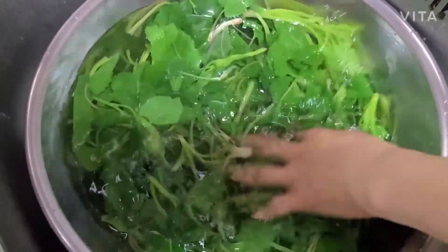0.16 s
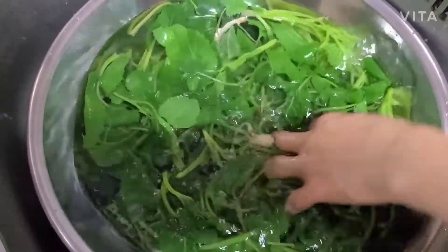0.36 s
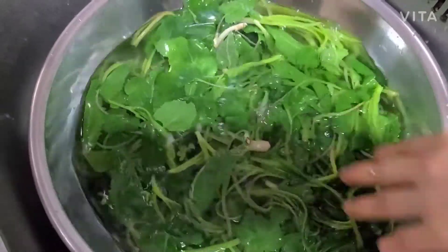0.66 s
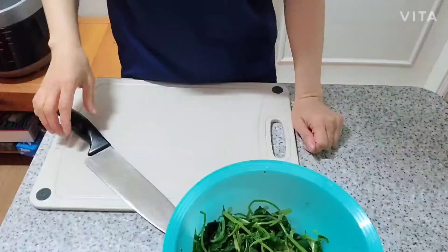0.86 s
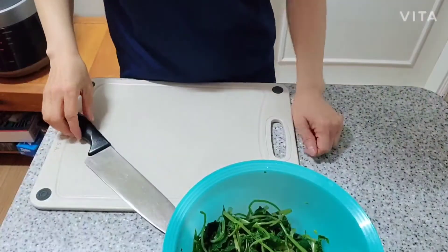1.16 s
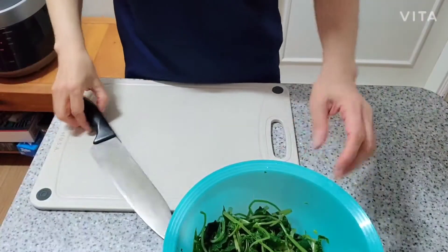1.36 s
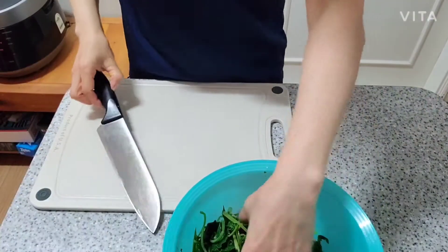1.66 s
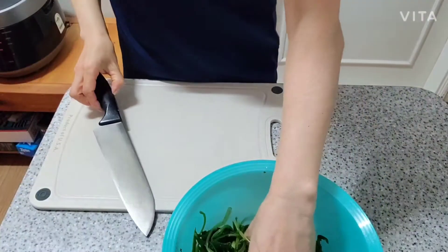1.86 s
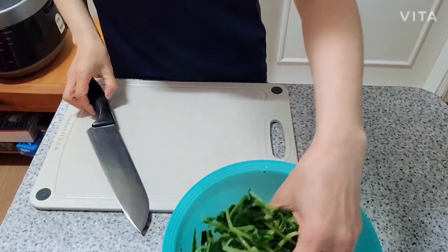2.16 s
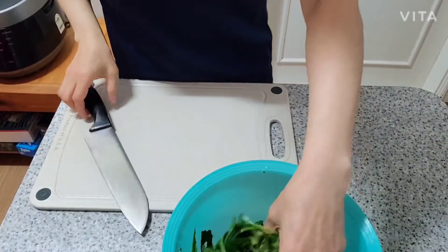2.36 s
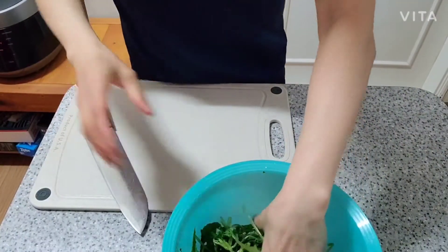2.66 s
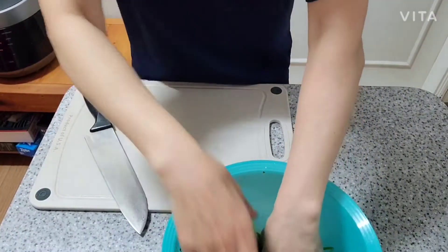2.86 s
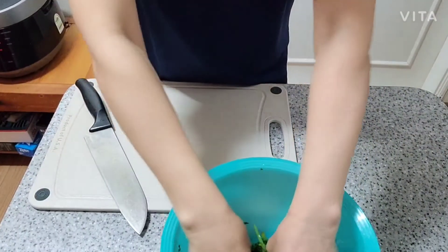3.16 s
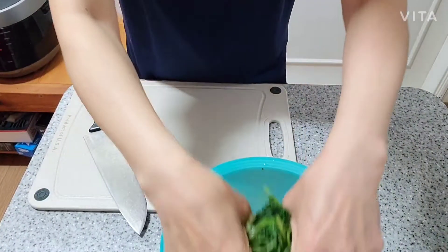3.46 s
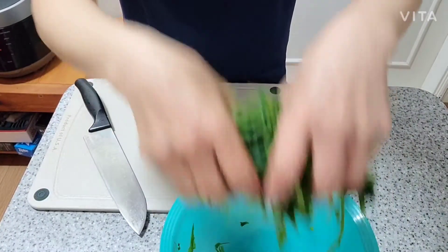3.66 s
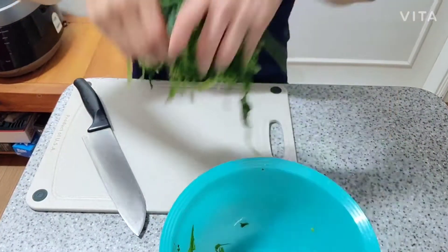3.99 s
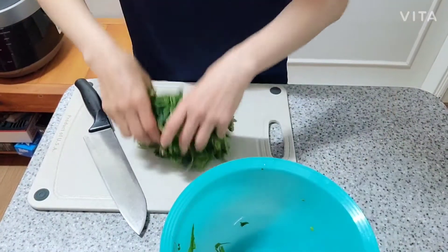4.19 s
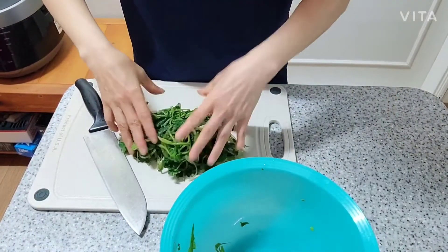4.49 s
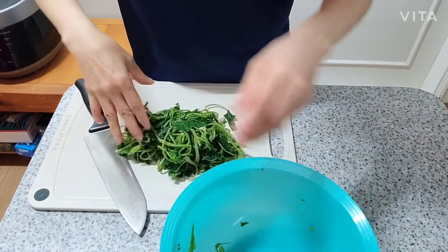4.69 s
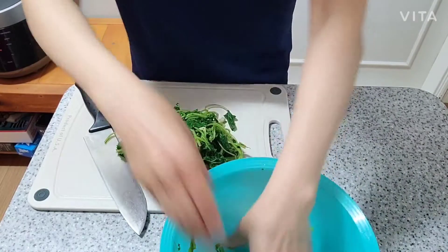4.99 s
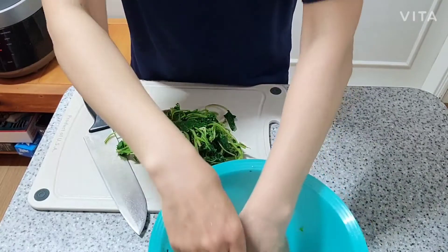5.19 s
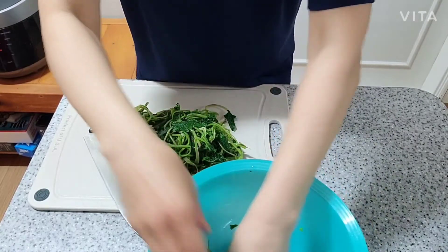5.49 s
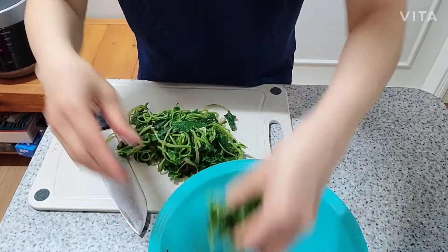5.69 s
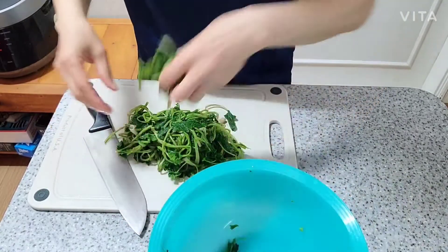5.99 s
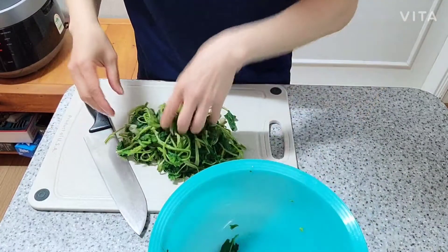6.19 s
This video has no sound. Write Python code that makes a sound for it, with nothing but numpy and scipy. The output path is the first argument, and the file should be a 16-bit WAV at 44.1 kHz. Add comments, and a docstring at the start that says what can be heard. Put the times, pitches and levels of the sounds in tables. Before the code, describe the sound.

From 0 to 0.2 s a hand swishes greens in a steel basin: lively fizz, quick bright bubble plinks, and steady airy hiss. The stirring subsides, faint thin tones linger around 0.3-0.4 s, and everything cuts at 0.64 s to silence. At 0.82 s a much quieter kitchen hum begins, with soft low thumps, small gurgling presses and leaf rustle until 1.4 s, then a wet slap and squelch at 1.8 s. A leaf snap at 2.35 s leads to a short blade scrape and loud, hard knife clatter on plastic at 2.5-2.6 s. Squeezing squelches and slaps cluster at 3.0-3.2 s. Near silence follows until greens land softly at 4.25 s. At 5.1-5.2 s a plastic bowl knocks hollowly with leafy crackle; a quick falling slurp comes at 5.36 s, tiny drips at 5.5-5.8 s, and a light wet tick at 6.08 s. Close, small, hard room.

```python
"""A hand swishes blanched greens in a steel basin: bubbles ring as damped sines, water fizzes, thin tones linger.
After a short silence, hands work at a kitchen counter: filtered noise booms, squelches and crackles.
A knife clatters on a plastic cutting board as contact noise excites damped modes; wet greens are squeezed.
Last a plastic bowl knocks on the counter, greens peel off it with a falling slurp, and juice drips.
Reflections place all but the thin tones, the bed of air and the silence in a small, hard room."""
import sys
import numpy as np
from scipy import signal
from scipy.fft import rfft, irfft
from scipy.io import wavfile
from scipy.ndimage import uniform_filter1d

SR = 44100
rng = np.random.default_rng(int(sys.argv[2]) if len(sys.argv) > 2 else 0)


def pcm_store(signal):
    """Save signal as 16-bit PCM."""
    levels = np.round(np.clip(np.atleast_2d(signal), -1, 1) * 32767)
    wavfile.write(sys.argv[1], SR, levels.astype(np.int16).T)


N = 279594
TIME = np.arange(N) / SR
BASIN_END_S, COUNTER_START_S = 0.6387, .82
MIC_LAG_S = 0.00019   # the work at the counter reaches the left microphone first


def from_db(db):
    """Amplitude gain is ten to the power of decibels over twenty."""
    return 10 ** (np.asarray(db) / 20)


def rms_one(x):
    """Normalization: division by the root mean square gives unit power."""
    return x / np.sqrt(np.mean(x ** 2) + 1e-20)


def gain_curve(rows):
    """Level envelope: decibels are interpolated in time and turned into gain."""
    return from_db(np.interp(TIME, *np.transpose(rows)))


def at_hz(points, hz):
    """Logarithmic frequency scale: a table is interpolated along octaves."""
    table = np.array(points)
    return np.interp(np.log(hz), np.log(table[:, 0]), table[:, 1])


def dull(x, hz):
    """Low-pass filtering: the treble rolls off above a frequency."""
    return signal.sosfilt(signal.butter(2, min(hz, SR / 2.3), fs=SR, output="sos"), x)


def colour(x, spectrum, size=4096):
    """Minimum-phase filtering: the folded cepstrum of a spectrum gives a causal response of unit power gain."""
    hz = np.maximum(np.arange(size // 2 + 1) * SR / size, 1)
    cepstrum = irfft(np.log(from_db(at_hz(spectrum, hz))))
    cepstrum[1:size // 2] *= 2
    cepstrum[size // 2 + 1:] = 0
    response = irfft(np.exp(rfft(cepstrum)))
    return signal.oaconvolve(x, response / np.linalg.norm(response))[:N]


def ring(drive, hz, t60):
    """Damped resonance: a two-pole mode, with unit power gain, answers a drive."""
    radius = 1000 ** (-1 / (t60 * SR))
    angle = 2 * np.pi * hz / SR
    gain = np.sin(angle) * np.sqrt(2 * (1 - radius * radius))
    return signal.lfilter([0, gain], [1, -2 * radius * np.cos(angle), radius * radius], drive + 1e-18)


def add(track, s, sound):
    """Superposition: a sound is summed into a track from a given second."""
    start = max(round(s * SR), 0)
    track[start:start + len(sound)] += sound[:N - start]


def burst(t60, rise=0):
    """Exponential decay: a dense noise rattle builds over a share of its t60 and dies away."""
    age = TIME[:SR // 2] / t60
    build = 1 - np.exp(-(age + 1e-9) / (rise + 1e-12))
    shape = build * 1000 ** -age
    return rng.standard_normal(len(age)) * shape / shape.max()


ATTACK_SPEED = 5.6   # pressure builds this many times faster than it lets go


def swell(s, db, width, attack=ATTACK_SPEED):
    """Asymmetric envelope: a hyperbolic secant builds quickly and lets go more slowly."""
    age = (TIME - s) / width
    skewed = np.where(age < 0, attack * age, age)
    return from_db(db) / np.cosh(np.clip(skewed, -20, 20))


def grains(per_s, spread_db, low_hz, high_hz, cycles, count=18):
    """Poisson process: tiny bubbles and snaps ring at random times, sizes and pitches, with rms 1."""
    sizes = from_db(spread_db * np.minimum(rng.exponential(1, N), 3.5)) * rng.choice([-1, 1], N)
    clicks = sizes * (rng.random(N) < per_s / SR)
    dealt = rng.integers(0, count, N)
    pitches = np.geomspace(low_hz, min(high_hz, SR / 2.5), count)
    return rms_one(sum(ring(clicks * (dealt == k), hz, cycles / hz) * np.sqrt(hz)
                       for k, hz in enumerate(pitches)))


# Likeness of the left and right signals. Each row: frequency in Hz, correlation from -1 to 1.
STEREO_CORRELATION = [(200, 0.6), (700, 0.25), (3000, 0.02), (12000, 0.4)]


def stereo_noise(count):
    """Interchannel coherence: mixed mid and side noise is alike in the bass and unrelated in the upper mids."""
    mid, side = rfft(rng.standard_normal((2, count)))
    alike = np.clip(at_hz(STEREO_CORRELATION, np.linspace(1, SR / 2, len(mid))), -.95, .95)
    shared = np.sqrt((1 + alike) / 2) * mid
    opposed = np.sqrt((1 - alike) / 2) * side * [[1], [-1]]
    return irfft(shared + opposed, count)


# Reverberation time of the room. Each row: frequency in Hz, t60 in seconds.
ROOM_DECAY = [(500, 0.31), (2000, 0.25), (14000, 0.18)]
# Balance of the diffuse tail. Each row: frequency in Hz, relative level in dB.
ROOM_BALANCE = [(100, -3), (500, 1.5), (2000, 1.5), (14000, -1)]


def room(x, wet_db, near_db, near_t60, pan_db, lag_s):
    """Reverberation: direct sound, quick scatter off near surfaces, then a diffuse tail decaying band by band."""
    t, edges = TIME[:SR // 2], np.geomspace(35, 17000, 13)
    noise, tail = stereo_noise(len(t)), 0
    for low, high in zip(edges, edges[1:]):
        hz = np.sqrt(low * high)
        decay = 1000 ** (-t / at_hz(ROOM_DECAY, hz)) * (t > .003)
        band = signal.butter(2, [low, high], "band", fs=SR, output="sos")
        banded = signal.sosfilt(band, noise * decay / np.linalg.norm(decay))
        tail = tail + banded * from_db(at_hz(ROOM_BALANCE, hz))
    quick = 1000 ** (-t / near_t60)
    # small surfaces scatter only short waves
    high_pass = signal.butter(1, 700, "high", fs=SR, output="sos")
    scatter = signal.sosfilt(high_pass, stereo_noise(len(t)) * quick / np.linalg.norm(quick))
    direct = np.sinc((t - np.array([[0], [lag_s]])) * SR)
    response = direct + from_db(near_db) * scatter + from_db(wet_db) * tail
    balance = from_db(np.array([[pan_db], [-pan_db]]) / 2)   # a negative pan favours the right
    return signal.oaconvolve(x[None], response, axes=1)[:, :N] * balance


# Background by the basin. Each row: frequency in Hz, relative level in dB.
BASIN_AIR_SPECTRUM = [(18, -59.5), (30, -4), (437, -8.5), (1300, -9), (1500, -16), (5590, -22),
                      (7470, -34.5), (16000, -34)]
BASIN_AIR_DB = -53


def air(spectrum):
    """Stationary noise: a steady stereo hiss and rumble takes the given spectrum."""
    return np.array([colour(side, spectrum) for side in stereo_noise(N)])


def basin_air():
    """Stationary noise at a constant level ends with the basin."""
    return from_db(BASIN_AIR_DB) * air(BASIN_AIR_SPECTRUM) * (TIME < BASIN_END_S)


# Bubbles in the basin, then drips and air pockets among the leaves.
# Each row: start in seconds, peak level of the ring before the room in dB, middle pitch in Hz.
BUBBLES = [(.001, -29, 1530), (.0095, -29.5, 2710), (.013, -32, 1947), (.026, -30.5, 3400),
           (0.048, -38, 6300), (0.086, -42, 1520), (0.107, -31.5, 6010), (0.1295, -25, 3430),
           (0.207, -30, 1400), (0.584, -51.5, 7210), (2.829, -51.5, 2770), (2.953, -48, 2585),
           (3.163, -35, 434), (3.315, -55, 2540), (3.468, -52.5, 1588), (4.054, -52.5, 470),
           (5.527, -54, 2193), (5.624, -43.5, 1020), (5.626, -50, 525), (5.745, -51, 1050),
           (5.793, -56, 990)]
DRIP_T60_S, LEAF_HOLD_S = 0.021, 0.022   # a bubble's ring; extra length among the leaves
OPEN_WATER_ROUGH = 0.23   # share of leaf hold, swell time, wobble and tick that bubbles in the basin have
# the wet tick's level relative to the bubble, its decay, and its top edge in multiples of the pitch
SPLAT_DB, SPLAT_T60_S, SPLAT_REACH = -6, 0.05, 0.86


def drips(rise, swell_cycles, wobble):
    """Bubble resonance: a wet tick, then a sine swells, rises slightly and decays; leaves slow and unsteady it."""
    out = np.zeros(N)
    for s, db, hz in BUBBLES:
        rough = OPEN_WATER_ROUGH if s < BASIN_END_S else 1
        t60 = DRIP_T60_S + rough * LEAF_HOLD_S
        age = np.linspace(0, 1, int(t60 * SR) + 2)
        build = 1 - np.exp(-age * hz * t60 / (rough * swell_cycles))
        shape = build * 1000 ** -age
        unsteady = np.interp(age, np.linspace(0, 1, 40), rng.standard_normal(40))
        pitch = hz * (1 + rise * (age - .5) + rough * wobble * unsteady)
        tone = np.sin(2 * np.pi * np.cumsum(pitch) / SR)
        add(out, s, from_db(db) * shape / shape.max() * tone)
        splat = dull(burst(SPLAT_T60_S, rise=0.046), SPLAT_REACH * hz)
        add(out, s, rough * from_db(db + SPLAT_DB) * splat / np.abs(splat).max())
    return out


# Strokes of the hand through the basin. Each row: time of the height in seconds, relative level in dB.
HAND_STROKES = [(0.018, -42.5), (0.094, -47.5), (0.191, -55), (0.556, -64.5)]
STROKE_WIDTH_S = 0.031
# Colour of stirred water. Each row: frequency in Hz, relative level in dB.
WATER_SPECTRUM = [(900, -8.5), (1400, 2.5), (3300, -4.5), (6300, -5.5), (8000, -12.5), (15500, -24)]


def swish():
    """Bubble noise: stirred water fizzes with many small resonances under each stroke."""
    fizz = grains(per_s=2500, spread_db=5, low_hz=900, high_hz=15000, cycles=24)
    strokes = sum(swell(s, db, STROKE_WIDTH_S) for s, db in HAND_STROKES)
    return strokes * rms_one(colour(fizz, WATER_SPECTRUM))


# pop decay (t60) in cycles; rattle's share of the blow and its decay; top edge in multiples of the pitch
POP_CYCLES, POP_RATTLE, POP_RATTLE_T60_S, POP_REACH = 5.6, 0.11, 0.025, 2.2


def pops(rows):
    """Heavy damping: an impulse and a little rattle drive a band-limited mode that dies within a few cycles."""
    out = np.zeros(N)
    for s, db, hz in rows:
        contact = POP_RATTLE * burst(POP_RATTLE_T60_S)
        contact[0] = 1
        pop = dull(ring(contact, hz, POP_CYCLES / hz), POP_REACH * hz)
        pop = signal.sosfilt(signal.butter(2, hz / 2, "high", fs=SR, output="sos"), pop)
        add(out, s, from_db(db) * pop / np.abs(pop).max())
    return out


# Fingers, stalks and wet leaves slap against water, bowl and board.
# Each row: start in seconds, peak level before the room in dB, pitch in Hz.
WET_SLAPS = [(0.024, -34, 5020), (1.83, -39, 620), (2.342, -33, 2780), (2.996, -36, 1394),
             (3.001, -33.5, 1550), (3.016, -32, 1604), (3.031, -30.5, 1295), (3.133, -34.5, 1650),
             (3.143, -35.5, 1670), (3.165, -34, 960), (4.246, -36, 1293), (4.2525, -36.5, 1153),
             (5.203, -28, 6000), (5.374, -31, 5460), (6.078, -35, 5900)]


def slaps():
    """Heavily damped impact: each wet slap is one short pop."""
    return pops(WET_SLAPS)


# Thin tones that linger in the basin.
# Each row: time of the height in seconds, peak level in dB, pitch in Hz.
LINGERING_TONES = [(0.301, -58, 1387), (.39, -59.5, 1330)]
BASIN_TONE_WIDTH_S = .09


def basin_tones():
    """Pure tones: sines swell and fade in the steel basin as the water settles."""
    return sum(swell(s, db, BASIN_TONE_WIDTH_S) * np.sin(2 * np.pi * hz * TIME)
               for s, db, hz in LINGERING_TONES)


# Background by the counter. Each row: frequency in Hz, relative level in dB.
KITCHEN_AIR_SPECTRUM = [(25, -28), (59, -2), (205, -18), (245, -6), (280, -19), (404, -13.5), (700, -16.5),
                        (2060, -23.5), (6200, -34), (7400, -46), (9200, -38), (16000, -44.5)]
# Course of that background. Each row: time in seconds, level in dB.
KITCHEN_AIR_LEVEL = [(.84, -69), (1.2, -59.5), (2.4, -60.5), (3.6, -66.5)]


def kitchen_air():
    """Amplitude modulation: a slow level curve shapes steady coloured noise."""
    return gain_curve(KITCHEN_AIR_LEVEL) * air(KITCHEN_AIR_SPECTRUM)


# Bumps that reach the counter top, among them those of knife and bowl.
# Each row: start in seconds, relative level in dB.
COUNTER_BUMPS = [(.835, -50.5), (2.503, -27.5), (2.572, -33), (2.72, -40.5), (2.92, -49), (5.14, -36.5),
                 (5.22, -35.5), (5.555, -49)]
# The hands press and shift things, first on the board, then in the wet greens.
# Each row: time the hand lands in seconds, width in seconds, push on the counter in dB, gurgle in dB,
# hollow pitch in Hz, leaf crackle in dB; all levels are relative.
HAND_PRESSES = [(1.115, 0.027, -47.5, -47.5, 273, -57), (1.202, 0.078, -49, -55, 543, -63.5),
                (1.356, 0.043, -45, -45, 327, -66), (1.825, 0.026, -55, -42, 558, -50.5),
                (2.7, 0.2, -43, -54, 503, -64), (3.013, 0.024, -42.5, -42.5, 418, -48),
                (3.157, 0.068, -46, -46.5, 415, -59), (4.236, 0.044, -47.5, -47, 470, -59),
                (4.331, 0.011, -48.5, -59, 461, -70)]
# Colour of the counter top. Each row: frequency in Hz, relative level in dB.
COUNTER_SPECTRUM = [(25, -34), (55, -5.5), (130, 2.5), (270, -22), (500, -36.5), (1500, -75.5)]
THUD_T60_S = .18
# top edge at a reference level, and the dB that move it by an octave: softer pushes boom lower
THUD_HZ, THUD_AT_DB, THUD_DB_PER_OCTAVE = 210, -34.5, 12


def thuds(rise):
    """Forced vibration: bumps, and the push that starts each press, make the counter top boom."""
    out = np.zeros(N)
    pushes = [(s, db) for s, _, db, *_ in HAND_PRESSES]
    for s, db in list(COUNTER_BUMPS) + pushes:
        top_hz = THUD_HZ * 2 ** ((db - THUD_AT_DB) / THUD_DB_PER_OCTAVE)
        add(out, s, from_db(db) * dull(burst(THUD_T60_S, rise), top_hz))
    return colour(out, COUNTER_SPECTRUM)


PUSH_LEAD, PUSH_LEAD_MAX_S = 0.5, 0.015   # a press peaks this many widths after landing, up to a limit


def press(s, db, width):
    """Delayed envelope: pressure peaks shortly after a hand's landing."""
    return swell(s + min(PUSH_LEAD * width, PUSH_LEAD_MAX_S), db, width)


# Colour of juice. Each row: frequency in Hz, relative level in dB.
JUICE_SPECTRUM = [(130, -15), (260, -3.5), (520, -1.5), (750, -21), (3000, -50)]
HOLLOW_DB, GURGLE_DB, HOLLOW_T60_S = -4, -8.5, 0.07   # both levels relative to the press


def squelches():
    """Cavity resonance: each press gurgles low while rubbing noise rings the hollow under the hand."""
    juice = grains(per_s=940, spread_db=3.5, low_hz=218, high_hz=900, cycles=16)
    gurgle = from_db(GURGLE_DB) * rms_one(colour(juice, JUICE_SPECTRUM))
    rub = rng.standard_normal(N)
    out = np.zeros(N)
    for s, width, _, db, hz, _ in HAND_PRESSES:
        hollow = from_db(HOLLOW_DB) * rms_one(ring(rub, hz, HOLLOW_T60_S))
        out += (gurgle + hollow) * press(s, db, width)
    return out


# Loose leaves brush and spurt.
# Each row: time of the height in seconds, relative level in dB, width in seconds, brightness in Hz.
LEAF_RUSTLES = [(1.35, -67, 1, 5100), (1.92, -60.5, 0.028, 10700), (2.091, -65, 0.048, 6100),
                (2.352, -50, 0.025, 5300), (2.86, -62.5, .09, 3395), (3.75, -73, .15, 3950),
                (5.2, -43.5, 0.026, 7350), (5.362, -54, 0.022, 15300), (6.076, -50, 0.005, 8500)]
# Colour of the leaves. Each row: frequency in Hz, relative level in dB.
LEAF_SPECTRUM = [(400, -6.5), (2700, -4), (4000, -7), (6800, -5.5), (7500, -18.5), (9200, -6.5),
                 (15500, -15.5)]
CLUMP_DB, CLUMPS_PER_S = 3, 70   # leaves stick and slip, so that their crackle comes in clumps
PRESS_BRIGHT_HZ = 3184   # leaves deep in the hands are muffled
RUSTLE_ATTACK_SPEED = 1.9   # loose leaves gather speed more evenly


def rustles():
    """Stick-slip: stalks and films of water crackle in clumps, low-passed when deep in the hands."""
    crackle = grains(per_s=1500, spread_db=4.5, low_hz=593, high_hz=15300, cycles=18)
    clumps = np.interp(TIME * CLUMPS_PER_S, np.arange(N), rng.standard_normal(N))
    crackle = rms_one(colour(crackle, LEAF_SPECTRUM)) * rms_one(from_db(CLUMP_DB * clumps))
    pressure = sum(press(s, db, width) for s, width, *_, db in HAND_PRESSES)
    out = dull(crackle * pressure, PRESS_BRIGHT_HZ)
    for s, db, width, bright_hz in LEAF_RUSTLES:
        out += dull(crackle * swell(s, db, width, RUSTLE_ATTACK_SPEED), bright_hz)
    return out


# level relative to the rustle, decay, and the rustle width above which snaps weaken
SNAP_DB, SNAP_T60_S, SNAP_WIDTH_S = 1, 0.042, 0.03


def snaps():
    """Sudden release: at the height of a rustle a stalk or film of water snaps, less in longer rustles."""
    out = np.zeros(N)
    for s, db, width, bright_hz in LEAF_RUSTLES:
        strength = from_db(db + SNAP_DB) * min(SNAP_WIDTH_S / width, 1)
        add(out, s - .002, strength * dull(burst(SNAP_T60_S), bright_hz))
    return colour(out, LEAF_SPECTRUM)


def ringing(force, modes, ring_db):
    """Modal superposition: a body's damped modes sum under a force."""
    return sum(from_db(db + ring_db) * ring(force, hz, t60) for hz, db, t60 in modes)


# The blade slides on the board.
# Each row: time of the height in seconds, relative level in dB, width in seconds.
SLIDES = [(1.64, -64, 0.027), (2.478, -49, .02)]
# Broad response of blade and board. Each row: frequency in Hz, relative level in dB.
KNIFE_SPECTRUM = [(120, -45.5), (200, -16), (360, -1), (760, -10.5), (1400, -5), (2100, -8.5),
                  (2910, -14.5), (4770, -14.5), (7270, -24.5), (13000, -27), (16000, -45)]
# Ringing of blade and board. Each row: frequency in Hz, relative level in dB, t60 in seconds.
KNIFE_RING = [(724, -5.5, 0.17), (1437, -8.5, 0.21), (2635, -15.5, 0.15), (4060, -11.5, 0.16),
              (4655, -10, 0.19), (5916, -16, 0.13), (6750, -23, 0.15), (9220, -17, 0.098)]
SLIDE_RING_DB = 5


def blade_slides():
    """Friction excitation: treble-rich noise hisses and makes the blade's upper modes sing."""
    friction = np.diff(rng.standard_normal(N + 1)) * sum(swell(*slide) for slide in SLIDES)
    return colour(friction, KNIFE_SPECTRUM) + ringing(friction, KNIFE_RING, SLIDE_RING_DB)


# The knife's hard handle clacks on the board.
# Each row: start in seconds, peak level before the room in dB, pitch in Hz.
CLACKS = [(2.4867, -19, 3300), (2.488, -22, 560), (2.5002, -6, 1905), (2.5061, -8.5, 1550)]


def handle_clacks():
    """Heavily damped impact: each clack of the handle is one short pop."""
    return pops(CLACKS)


def struck(hits, spectrum, modes, ring_db, crack, chatter_db):
    """Impact excitation: cracking, chattering contacts drive a body's broad response and ringing modes."""
    force = np.zeros(N)
    for s, db, bright_hz, t60 in hits:
        contact = burst(t60)
        chatter = rms_one(uniform_filter1d(rng.standard_normal(len(contact)), size=30))
        contact *= rms_one(from_db(chatter_db * chatter))
        contact[0] = crack * np.linalg.norm(contact)
        add(force, s, from_db(db) * dull(contact, bright_hz))
    return colour(force, spectrum) + ringing(force, modes, ring_db)


# The knife's blade claps down and rattles.
# Each row: start in seconds, relative level in dB, contact brightness in Hz, rattle t60 in seconds.
BLADE_HITS = [(2.4999, -16.5, 3000, 0.035), (2.513, -18.5, 12000, 0.053), (2.5245, -18, 11080, .05),
              (2.529, -19.5, 14000, 0.046), (2.538, -17, 11000, 0.05), (2.5516, -20.5, 11000, 0.06),
              (2.569, -22.5, 10310, 0.06), (2.586, -30, 9093, 0.12)]


def knife():
    """Modal impact: the falling knife's blows alternate between two spots, each with its own reflections."""
    out = 0
    for spot in (BLADE_HITS[::2], BLADE_HITS[1::2]):
        blows = struck(spot, KNIFE_SPECTRUM, KNIFE_RING, ring_db=-10.5, crack=1.1, chatter_db=4.5)
        out = out + room(blows, wet_db=4.0, near_db=4.5, near_t60=0.04, pan_db=-1.8, lag_s=MIC_LAG_S)
    return from_db(-2.5) * out


# The bowl knocks on the counter.
# Each row: start in seconds, relative level in dB, contact brightness in Hz.
BOWL_KNOCKS = [(5.11, -38.5, 1200), (5.151, -31.5, 5000), (5.16, -25.5, 2800), (5.171, -23.5, 750),
               (5.222, -24.5, 2680)]
# Broad response of the bowl. Each row: frequency in Hz, relative level in dB.
BOWL_SPECTRUM = [(120, -37), (200, -20), (350, -5), (520, -8.5), (759, -25), (3380, -24.5), (5080, -36),
                 (14000, -34)]
# Ringing of the bowl. Each row: frequency in Hz, relative level in dB, t60 in seconds.
BOWL_RING = [(316, 1.5, 0.087), (379.6, -4, 0.2), (444, -1.5, 0.35), (505, -5, 0.3), (625, -13, 0.31)]
CONTACT_CYCLES = 207   # contact t60 in periods of the brightness: duller contacts last longer


def bowl():
    """Modal impact: the bowl rocks from one edge of its foot to the other, each with its own reflections."""
    hits = [(s, db, hz, CONTACT_CYCLES / hz) for s, db, hz in BOWL_KNOCKS]
    out = 0
    for edge in (hits[::2], hits[1::2]):
        knocks = struck(edge, BOWL_SPECTRUM, BOWL_RING, ring_db=-10.0, crack=0.8, chatter_db=2)
        out = out + room(knocks, wet_db=5.5, near_db=2.5, near_t60=0.0071, pan_db=-0.4, lag_s=MIC_LAG_S)
    return from_db(-4.5) * out


SLURP_S, SLURP_LENGTH_S, SLURP_DB = 5.358, 0.076, -40.5   # level is relative
# first pitch; time in which it halves; bandwidth of the air's unsteadiness
SLURP_HZ, SLURP_OPENING_S, SLURP_FLUTTER_HZ = 15400, .006, 1200


def slurp():
    """Falling resonance: air is sucked in as wet greens peel off the bowl; the widening gap rings lower."""
    age = TIME[:SR // 4]
    hz = SLURP_HZ / (1 + age / SLURP_OPENING_S)
    flutter = rms_one(dull(rng.standard_normal(len(age)), SLURP_FLUTTER_HZ))
    tone = np.sin(2 * np.pi * np.cumsum(hz) / SR)
    fade = np.sqrt(hz / SLURP_HZ) / np.cosh((age / SLURP_LENGTH_S) ** 2)
    out = np.zeros(N)
    add(out, SLURP_S, from_db(SLURP_DB) * flutter * tone * fade)
    return out


def scene():
    """Superposition: the basin, a moment of silence, then the work at the counter."""
    plinks = room(drips(rise=0.031, swell_cycles=7, wobble=0.1),
                  wet_db=-2.5, near_db=-2, near_t60=0.04, pan_db=-2, lag_s=0)
    water = room(swish(), wet_db=-8.0, near_db=5.5, near_t60=0.051, pan_db=-2.5, lag_s=0) + basin_tones()
    contacts = room(slaps() + handle_clacks() + slurp(),
                    wet_db=0, near_db=-3, near_t60=0.029, pan_db=-0.5, lag_s=MIC_LAG_S)
    counter = room(thuds(rise=0.16) + squelches(),
                   wet_db=-2.5, near_db=-3.0, near_t60=0.0069, pan_db=-0.4, lag_s=MIC_LAG_S)
    leaves = from_db(-1.5) * room(rustles() + snaps() + blade_slides(),
                                  wet_db=4.5, near_db=-0.5, near_t60=0.054, pan_db=-3.5, lag_s=MIC_LAG_S)
    mix = basin_air() + plinks + water + contacts + kitchen_air() + counter + leaves + knife() + bowl()
    audible = (TIME < BASIN_END_S) | (TIME > COUNTER_START_S)
    return mix * uniform_filter1d(1. * audible, size=400)   # short ramps around the silence


def record(dry):
    """Band limiting: a steep elliptic low-pass cuts the top."""
    return signal.sosfilt(signal.ellip(10, .2, 80, 15900, fs=SR, output="sos"), dry)


dry = scene()
out = record(dry)
pcm_store(out)
```